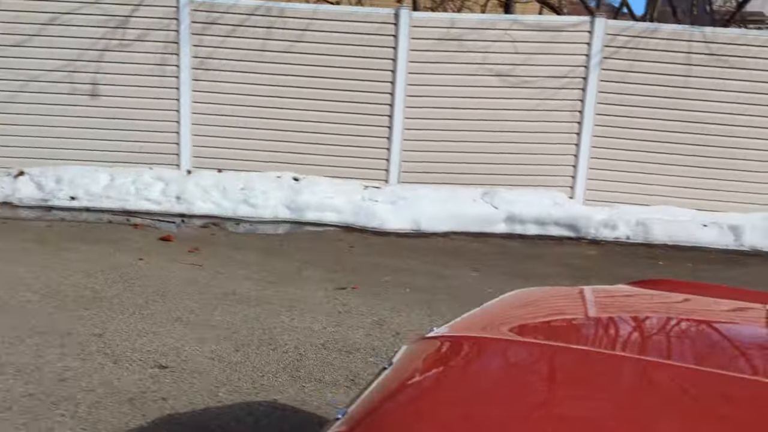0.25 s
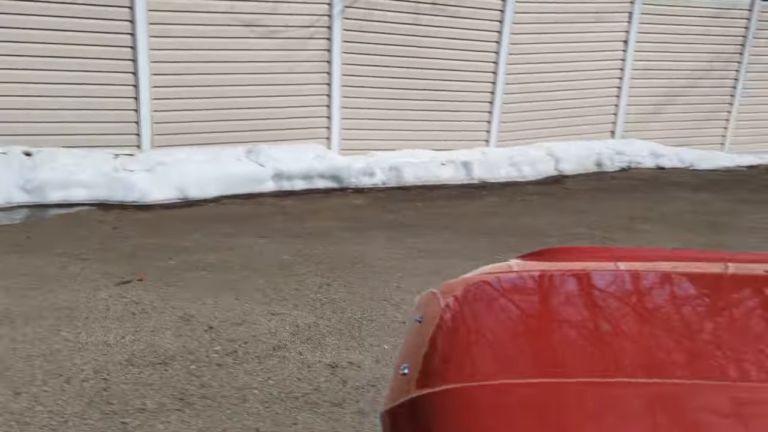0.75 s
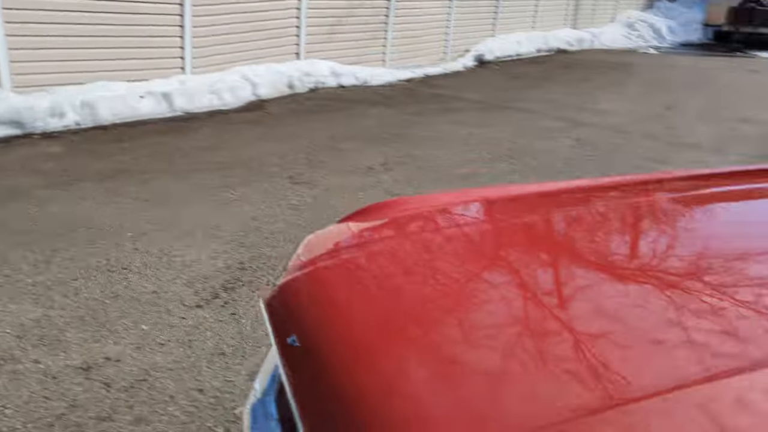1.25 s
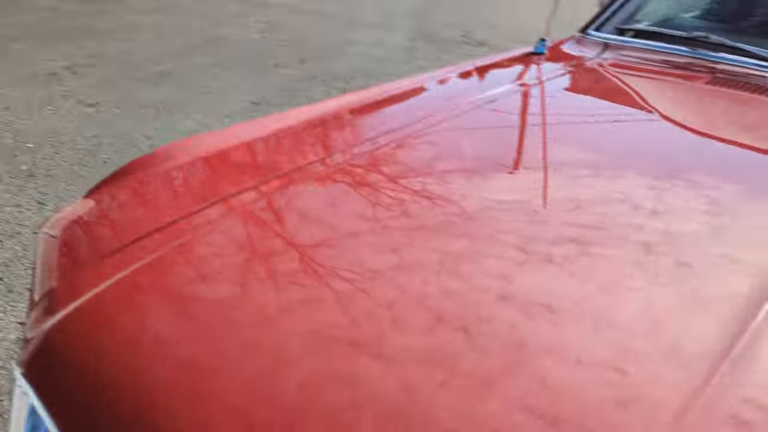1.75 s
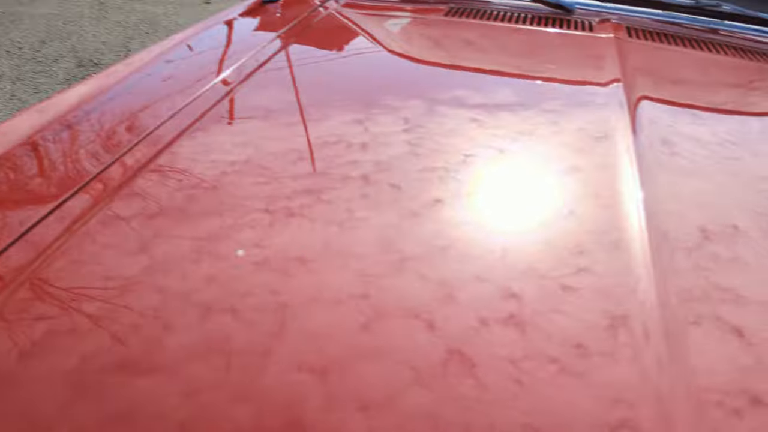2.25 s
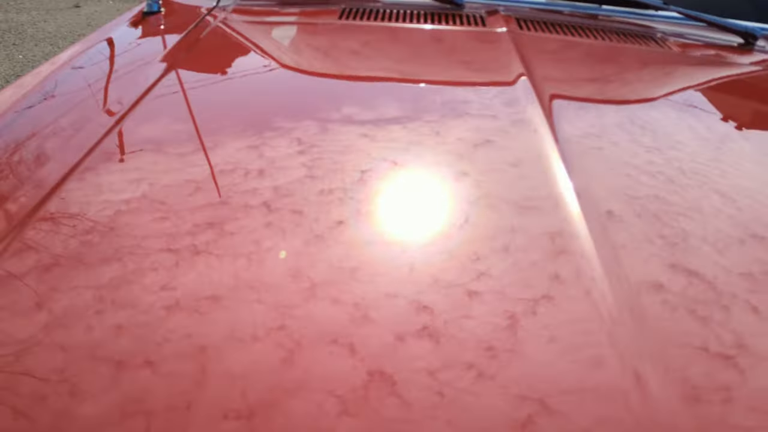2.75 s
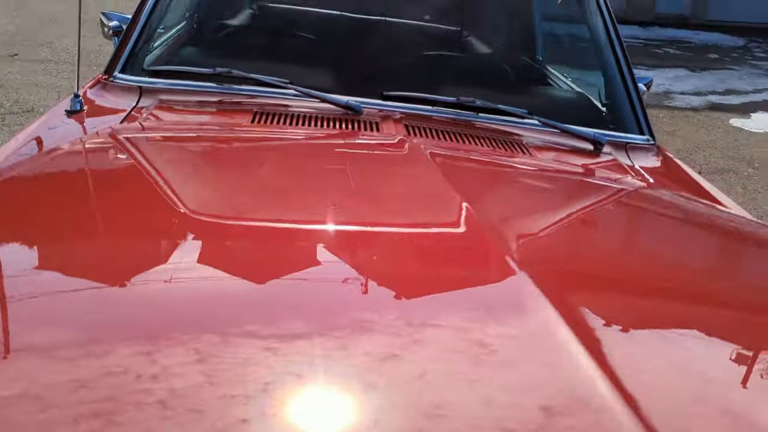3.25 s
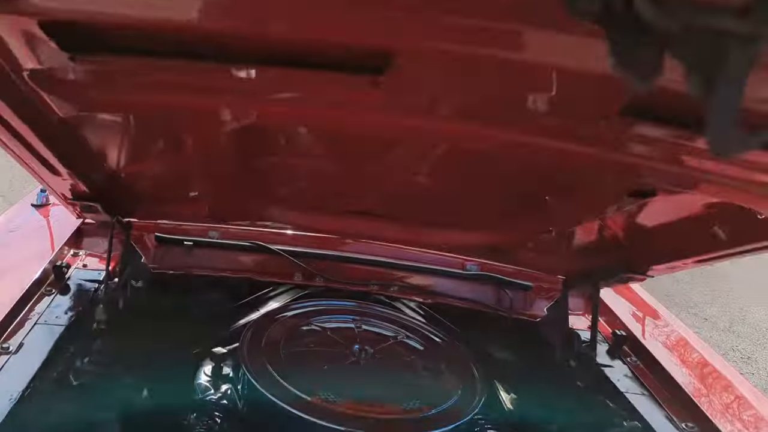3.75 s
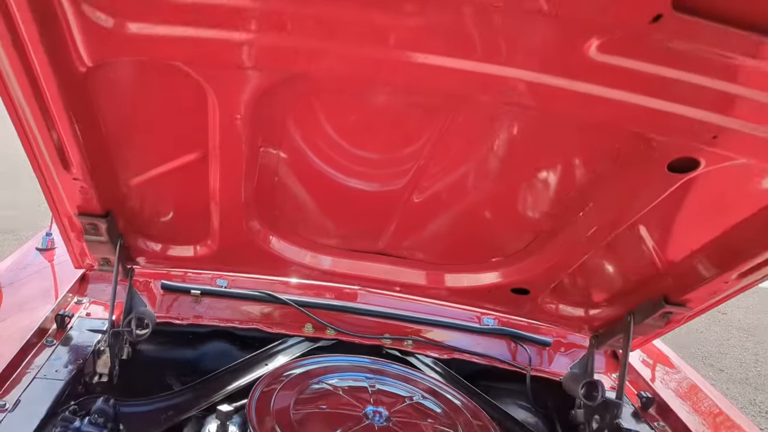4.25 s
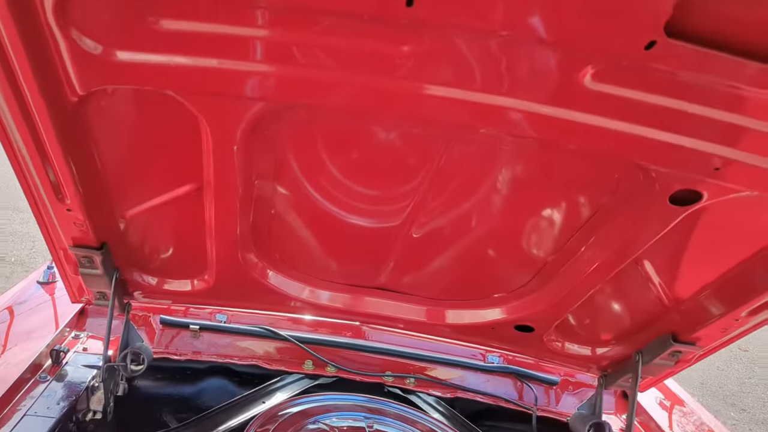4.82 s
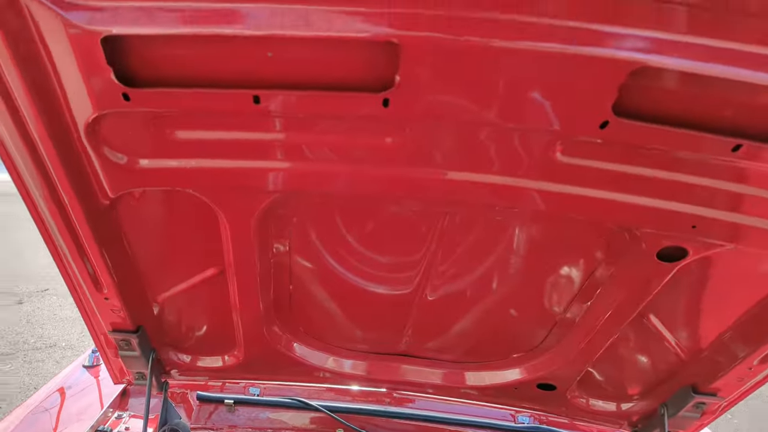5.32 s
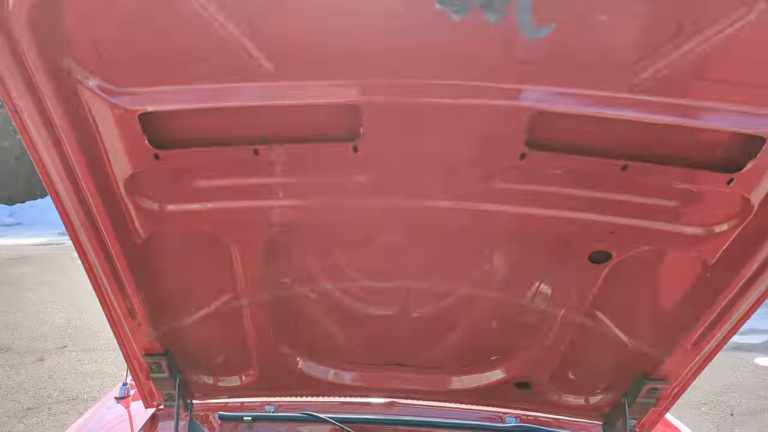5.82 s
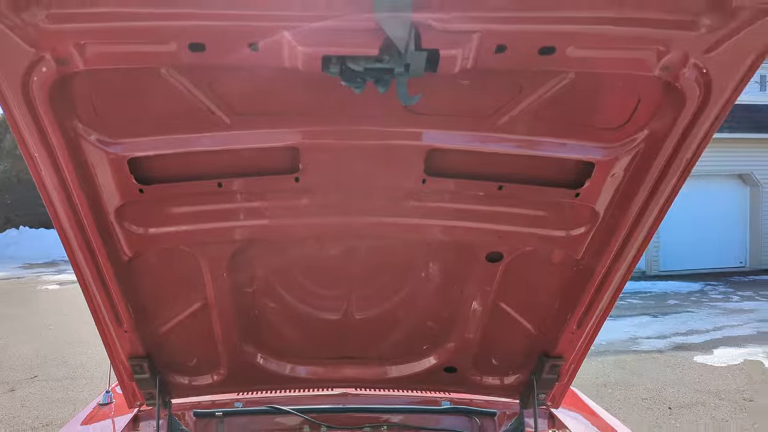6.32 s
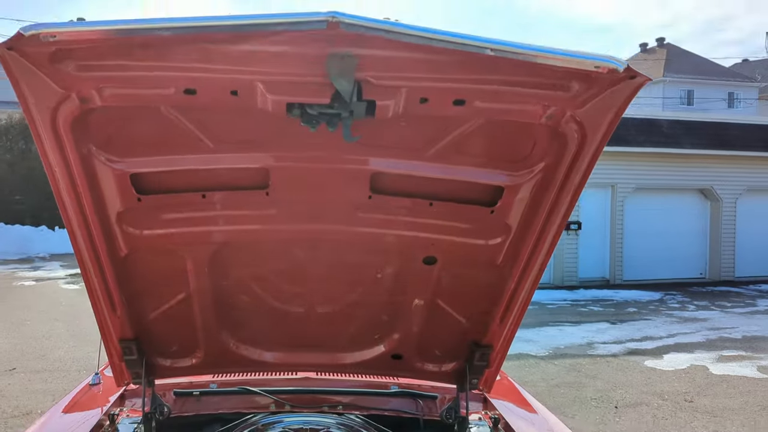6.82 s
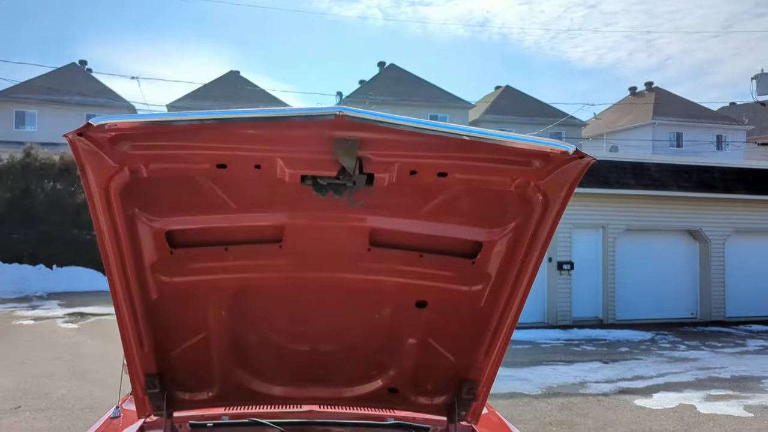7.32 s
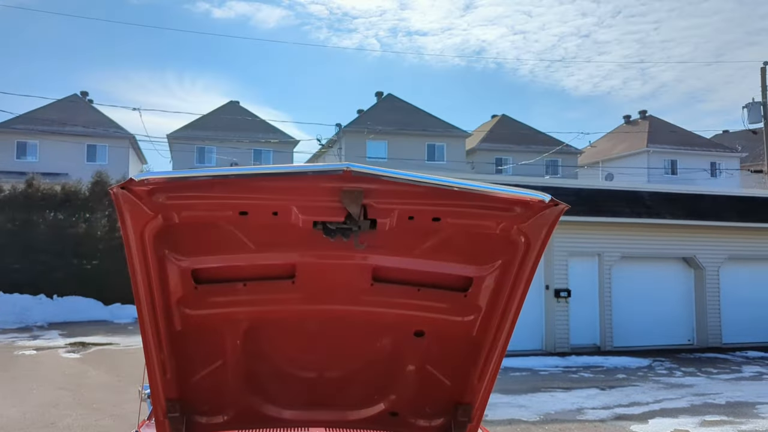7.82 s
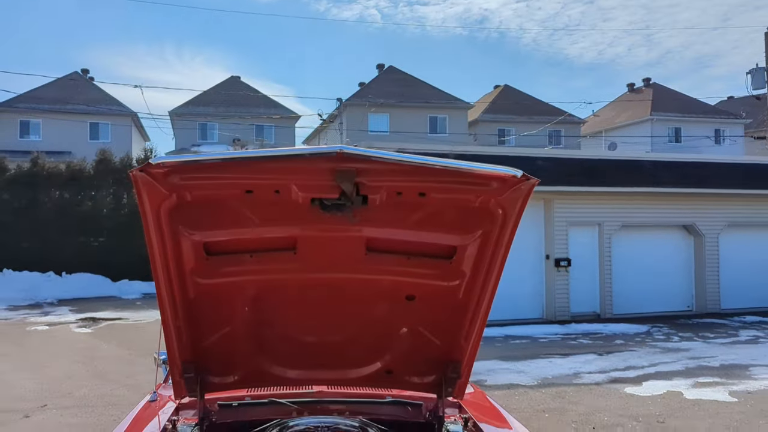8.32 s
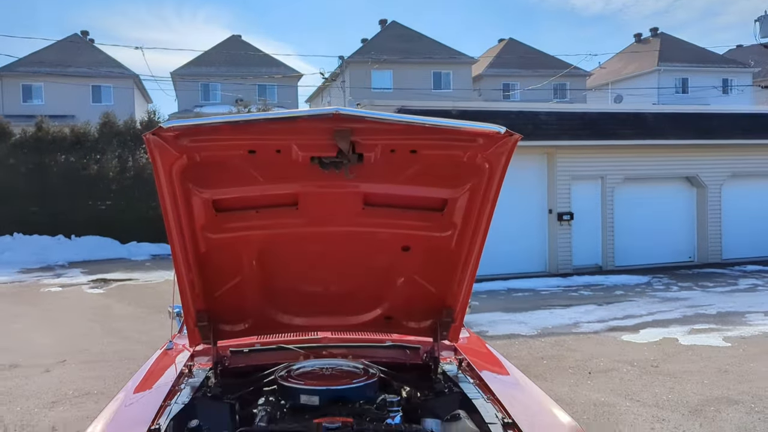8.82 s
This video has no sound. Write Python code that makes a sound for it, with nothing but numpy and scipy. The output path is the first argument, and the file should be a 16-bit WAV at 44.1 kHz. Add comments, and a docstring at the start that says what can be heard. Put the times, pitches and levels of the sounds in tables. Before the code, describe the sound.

A big V8 idles for about nine seconds, close to a hand-held phone in an outdoor paved yard. At first a lumpy exhaust throb and burble dominate, with muffled fan noise under the closed bonnet. From 0.5 to 1 second a near-pure bass drone around 120 hertz swells, then wavers, beats and briefly drops out as the idle hunts. Faint latch fumbling at 2.5 seconds leads to a loud, bright metal snap at 2.7, with a short steel rattle and dull low thump. Between 3.4 and 4.2 the bonnet opens: broad fan roar and wide, breathy intake hiss rise, pulsing with rapid valve ticks and carrying faint whistles. Light tappet ticks recur about five or six times a second from 3.6 to 5.8, and briefly around 8. After 6 seconds the phone steps back; drone and hiss ease while the steady, uneven idle continues to the end.

```python
"""The exhaust of a big V8 throbs at an uneven idle while a hand-held phone moves round the car's nose.
Firing tones and ragged pulses ring the pipes; a drone swells as the idle nears a pipe resonance.
The bonnet latch snaps as noise rattling steel, with low sine thumps from the bonnet on its spring.
The open bay is coloured noise: fan roar, and intake hiss that flares at valve ticks, with faint whistles.
A loose tappet adds brief bursts, and a fence sends back the bass."""
import sys
import numpy as np
from scipy import signal
from scipy.fft import rfft, irfft, next_fast_len
from scipy.io import wavfile
from scipy.ndimage import uniform_filter1d

SR = 44100
rng = np.random.default_rng(int(sys.argv[2]) if len(sys.argv) > 2 else 0)


def waveform_to_disk(signal):
    """Save audio, clipped to [-1, 1], as 16-bit WAV at the path in sys.argv[1]."""
    frames = np.transpose(np.atleast_2d(signal))
    scaled = np.clip(frames, -1, 1) * 32767
    samples = np.round(scaled).astype(np.int16)
    wavfile.write(sys.argv[1], SR, samples)


N = 399977  # length in samples

# clean firing tones: cycle_multiple, level_db (beside the throb), wander_db, phase_turns
FIRING_TONES = [(8, -2, 1.5, 0), (11, -7, 3.5, .1), (10, -11, 4, .2), (12, -13, 4, .6)]
# pipe resonances of the throb: pitch_hz, width_hz, level_db (beside the throb)
THROB_PIPE = [(58, 22, -5), (84, 24, -10), (120, 26, -1), (155, 30, -8)]
# pipe resonances of the burble: pitch_hz, width_hz, level_db (beside each other)
BURBLE_PIPE = [(203, 20, -11), (224, 20, 0), (243, 20, -3.5), (270, 26, -6), (292, 18, -13), (320, 24, -18),
               (372, 16, -21)]
# upper pipe note: pitch_hz, width_hz
PIPE_NOTE = (343, 18)
# fader of the low throb: time_s, gain_db
THROB_FADER = [(0, -30.5), (5, -30), (9.07, -34)]


def exhaust(cycle, burble_db, note_db):
    """Clean firing tones, and ragged firings with gas turbulence ringing the pipes."""
    tones = np.zeros(N)
    for multiple, level_db, wander_db, phase_turns in FIRING_TONES:
        gain = np.sqrt(2) * undb(level_db + wander_db * walk(6))
        tones += gain * np.cos(2 * np.pi * (multiple * cycle + phase_turns))
    pulses = firings(cycle, jitter_s=.0004, scatter=.4)
    turbulence = rng.standard_normal(N)
    gas = level(pulses, 0) + level(turbulence, -3)
    throb = (tones + pipe(gas, THROB_PIPE)) * undb(curves(THROB_FADER)[0])
    burble = level(pipe(gas, BURBLE_PIPE), 2.66) * undb(burble_db)
    note = level(band(gas, *PIPE_NOTE), 2.75) * undb(note_db)
    return throb + burble + note


# lumpy firing strengths, one per firing of the cycle: mean_level_db
FIRING_STRENGTH = [-3.5, 0, -2.5, -3, -4, -1, -3, 0.5]


def firings(cycle, jitter_s, scatter):
    """One pulse a cylinder, each a little early or late and of its own strength."""
    at = np.flatnonzero(np.diff(np.floor(8 * cycle)))
    strength_luck, timing_luck = rng.standard_normal((2, len(at)))
    cylinder = np.floor(8 * cycle[at + 1]).astype(int) % 8
    size = undb(np.array(FIRING_STRENGTH)[cylinder]) + scatter * strength_luck
    shift = (jitter_s * SR * timing_luck).astype(int)
    pulses = np.zeros(N)
    pulses[np.clip(at + shift, 0, N - 1)] = size
    return pulses


# faders of the hum: time_s, drone_db (as if on the resonance), beats_db (its neighbours)
HUM_FADERS = [(0, -27.5, -33), (.45, -14.5, -28.5), (.7, -10, -33), (1.0, -6.5, -33.5), (1.5, -9, -24.5),
              (1.7, -7.5, -28), (1.95, -9, -21.5), (2.2, -3.5, -38), (2.8, -5.5, -22), (3.1, -11, -20),
              (3.35, -6, -25), (3.6, -8, -34), (4.15, -5, -26), (4.5, -6.5, -25), (5.0, -5.5, -32),
              (5.7, -7, -30), (6.1, -11.5, -26), (6.6, -11.5, -30), (7.3, -14, -34), (7.9, -11.5, -31.5),
              (8.5, -13, -30.5), (9.07, -12.5, -37)]
# pipe resonance that swells the drone: pitch_hz, width_hz
DRONE_PIPE = (125, 8)
# neighbours that beat with the drone: cycle_multiple, level_db (before the beats fader)
BEAT_TONES = [(20, -2), (22, 0.5), (23, 0)]
# brief dips and jumps of the hum: centre_s, change_db
HUM_LURCHES = [(.12, 2), (.35, -3), (.47, 2.5), (.81, -5), (.99, 1), (1.712, -11), (1.828, -8), (2.054, -3),
               (2.323, -16), (2.654, -14), (2.746, -21), (2.862, -1), (3.133, -19), (3.35, -16),
               (3.923, -14), (4.0, -4.5), (4.267, -14), (4.399, -13), (4.49, -3), (4.578, -12.5),
               (4.76, -8), (4.83, -5), (5.15, -4.5), (5.283, -4), (5.7, -1.5), (5.78, 3), (5.997, -8),
               (6.15, 5), (6.54, -8), (6.717, -7), (7.25, 6), (7.59, 5), (7.696, -14), (7.977, -16),
               (8.51, 2), (8.71, 4), (8.867, -8)]
DRONE_MULTIPLE = 21  # of the cycle rate
BEAT_TURNS = -0.21  # phase of the neighbours, in turns
LURCH_S = 0.032  # from the centre of a lurch to 1/e of its dB change


def hum(cycle):
    """A near-pure drone follows the idle through a pipe resonance, beats with the cycle and lurches."""
    pitch_hz, width_hz = DRONE_PIPE
    pole = np.exp((2j * pitch_hz - width_hz) * np.pi / SR)
    driver = np.exp(2j * np.pi * DRONE_MULTIPLE * cycle)
    drone = signal.lfilter([1 - abs(pole)], [1, -pole], driver).real
    beats = sum(undb(level_db) * np.cos(2 * np.pi * (multiple * cycle + BEAT_TURNS))
                for multiple, level_db in BEAT_TONES)
    lurch_db = np.zeros(N)
    around = np.arange(-SR // 10, SR // 10)
    for centre_s, change_db in HUM_LURCHES:
        lurch_db[int(centre_s * SR) + around] += change_db * np.exp(-(around / SR / LURCH_S) ** 2)
    drone_db, beats_db = curves(HUM_FADERS)
    return np.sqrt(2) * (drone * undb(drone_db) + beats * undb(beats_db)) * undb(lurch_db)


# latch snaps: start_s, level_db (noise before decay and mix), t60_s, top_hz, left_minus_right_db
LATCH_SNAPS = [(2.468, -29.5, 0.055, 1500, 3), (2.505, -26, 0.07, 7000, 6), (2.7125, -4.5, 0.12, 14600, 2),
               (2.7207, -18, 0.14, 14400, 16), (2.743, -13, 0.07, 11900, 16), (2.755, -14, 0.12, 4840, 4),
               (2.772, -24.5, 0.37, 2170, 2.5)]
# what latch and bonnet ring with: pitch_hz, width_hz, level_db (before width trim and mix)
STEEL_MODES = [(635, 160, 10.5), (820, 170, 7), (1017, 210, 9.5), (1250, 260, 5.5), (1510, 340, 3),
               (1810, 750, -1), (2890, 1300, -3), (3660, 650, -1), (4170, 180, 0), (4730, 500, 0),
               (5240, 400, -4.5), (6300, 600, -5), (8479, 1100, -8), (11950, 900, -5)]
# the bonnet jumps on its spring: start_s, pitch_hz, envelope_peak_db, time_to_peak_s
BONNET_THUMPS = [(2.724, 59, -7.5, .042), (2.757, 150, -17, .025), (2.755, 228, -12, .028)]


def latch():
    """Each snap is a decaying crack of noise that rattles the steel; low sines thump with the bonnet."""
    crack, thump = np.zeros((2, N)), np.zeros(N)
    t = np.arange(SR // 2) / SR
    for start_s, level_db, t60_s, top_hz, pan_db in LATCH_SNAPS:
        shape = (1 - np.exp(-t / .003)) * np.exp(-np.log(1000) * t / t60_s)
        tone = signal.butter(1, [500, top_hz], "band", fs=SR, output="sos")
        noise = signal.sosfilt(tone, rng.standard_normal((2, len(t))))
        pan = undb(np.array([[pan_db], [-pan_db]]) / 2)
        crack[:, int(start_s * SR):][:, :len(t)] += level(noise, level_db) * shape * pan
    # the width trim lifts narrow modes and lowers wide ones
    ring = sum(undb(level_db) * np.sqrt(300 / width_hz) * band(crack, pitch_hz, width_hz)
               for pitch_hz, width_hz, level_db in STEEL_MODES)
    for start_s, pitch_hz, peak_db, peak_s in BONNET_THUMPS:
        shape = (t / peak_s * np.exp(1 - t / peak_s)) ** 2
        thump[int(start_s * SR):][:len(t)] += undb(peak_db) * shape * np.sin(2 * np.pi * pitch_hz * t)
    return thump + undb(-1) * ring + undb(-7) * crack


# the loosest tappet at its loudest: start_s, level_db (before envelope and noise trim)
TAPPET_HITS = [(3.646, -35), (3.8622, -37), (3.993, -39), (4.171, -35), (4.3488, -36), (4.529, -38),
               (4.7108, -37), (4.8869, -35), (5.049, -29), (5.2371, -35), (5.4616, -48), (5.5932, -38),
               (5.7663, -47), (7.9262, -38.5), (8.1132, -41), (8.2952, -41)]


def tappet():
    """Brief bursts of band noise, as the loosest tappet rings the valve cover."""
    push = np.zeros(N)
    t = np.arange(SR // 25) / SR
    shape = t / 0.0038 * np.exp(1 - t / 0.0051)
    for start_s, level_db in TAPPET_HITS:
        start = int(start_s * SR)
        push[start:][:len(t)] = undb(level_db) * shape[:N - start]
    return np.array([level(band(rng.standard_normal(N), 3030, 2000), -1.5) * push for _ in "LR"])


# colours of the bay noise, before levelling: bonnet shut, leaning in, stepping back;
# each holds pitch_hz, density_db
ROAR_COLOURS = [
    [(220, -22), (380, -2.5), (446, -13.5), (553, -6), (655, -14.5), (840, -15.5), (910, -16), (978, -11.5),
     (1050, -17), (1400, -17), (3200, -27), (4160, -67), (7040, -120)],
    [(220, -28), (380, 1.5), (450, -5), (593, 2.5), (655, -5.5), (818, -1), (1110, -5.5), (1380, -4),
     (1600, -7.5), (1930, -9.5), (2090, -4), (2450, -22), (3200, -14.5), (4160, -70), (7040, -120)],
    [(220, -41), (380, -9), (423, -8), (466, -2.5), (588, 3.5), (716, -6), (871, -5.5), (943, -3.5),
     (1190, -5), (1490, -8.5), (2120, -5), (2610, -17.5), (3200, -23), (4160, -57), (7040, -120)],
]
HISS_COLOURS = [
    [(1290, -28), (2200, -3), (2800, -15), (3700, -2.5), (4020, -7), (4950, -8), (5650, -10.5),
     (8610, -10.5), (9830, -16.5), (14400, -14.5), (15900, -20)],
    [(1290, -32), (2200, -3), (2470, -4), (3470, -3), (3740, -0.5), (4230, -2.5), (5030, -3), (5560, -7),
     (5980, -4), (7730, -5), (8750, -1.5), (9830, -10), (12000, -3), (14900, -10.5), (15900, -13)],
    [(1290, 3.5), (2200, -6.5), (2550, -17), (2800, -20), (3040, -5), (3670, -8), (4750, -2), (5560, -5),
     (6130, -1), (7360, -9), (8680, -4), (9830, -9), (13600, -7), (15000, -11), (15900, -21)],
]
# valve ticks: place_firings (in the cycle), level_db (mean over the hiss, before attack), decay_s
VALVE_TICKS = [(3.2, 1, .012), (5.3, 0, .01), (.3, -2.5, .008), (6.6, -4, .008), (1.4, -4, .008)]


def bay(cycle, roar_db, hiss_db):
    """Fan roar, and intake hiss that flares at each valve tick, stronger on some cycles."""
    flare = np.zeros(N)  # added power
    for place_firings, level_db, decay_s in VALVE_TICKS:
        turn = cycle - place_firings / 8
        luck = rng.standard_normal(99)[np.floor(turn).astype(int) + 2]
        since_s = turn % 1 / 5.6  # at a nominal 5.6 cycles per s
        shape = (1 - np.exp(-since_s / .005)) * np.exp(-since_s / decay_s)
        flare += undb(level_db + 1.8 * luck) ** 2 * shape
    roar = air(ROAR_COLOURS) * undb(roar_db + 1.5 + .7 * walk(12)) * np.sqrt(1 + .35 * flare)
    hiss = (air(HISS_COLOURS) + whistles()) * undb(hiss_db + .3 * walk(20)) * np.sqrt(1 + flare)
    return flicker(roar + hiss)


# narrow bands that stand out of the hiss: pitch_hz, width_hz, level_db (beside the hiss, bonnet up)
BAY_WHISTLES = [(3040, 140, -23), (3960, 90, -22), (4260, 70, -21), (4850, 200, -20), (5910, 100, -21),
                (8560, 400, -19), (11970, 150, -17)]


def whistles():
    """Narrow bands of noise that come and go, each on its own, weaker while the bonnet is shut."""
    bands = np.zeros((2, N))
    for pitch_hz, width_hz, level_db in BAY_WHISTLES:
        sides = [level(band(rng.standard_normal(N), pitch_hz, width_hz), level_db) for _ in "LR"]
        bands += undb(2.5 * walk(1.5)) * np.array(sides)
    shut = curves(BAY_STANCE)[0]
    return bands * (1 - .6 * shut)


# likeness of left and right: pitch_hz, share (0-1)
STEREO_LIKENESS = [(300, 0.69), (640, 0.82), (1400, 0.38), (3000, 0), (16000, 0)]
# share of each bay colour: time_s, shut_share, leaning_in_share, stepping_back_share (0-1)
BAY_STANCE = [(0, 1, 0, 0), (3.3, 1, 0, 0), (3.6, 0, 1, 0), (5.3, 0, 1, 0), (6.4, 0, 0, 1), (9.07, 0, 0, 1)]


def air(colours):
    """Stereo noise whose colour follows the stance; the bass is alike left and right, the treble is not."""
    size = next_fast_len(N)
    log_hz = np.log(np.arange(size // 2 + 1) * SR / size + 1)
    like_hz, like_share = np.transpose(STEREO_LIKENESS)
    like = np.clip(np.interp(log_hz, np.log(like_hz), like_share), 0, 1)
    mid_side = rfft(rng.standard_normal((2, size))) * np.sqrt([1 + like, 1 - like])
    out = np.zeros((2, N))
    for colour, share in zip(colours, curves(BAY_STANCE)):
        hz, density_db = np.transpose(colour)
        gain = undb(np.interp(log_hz, np.log(hz), density_db, left=-99, right=-99))
        mid, side = irfft(mid_side * gain, size)[:, :N]
        out += share * np.array([mid + side, mid - side]) / np.sqrt(np.mean(mid ** 2))
    return out


# patches of noise as many small parts ring briefly: width_hz, length_s, spread_db
FLICKER_PATCHES = [(90, .035, 2.4), (260, .35, .9)]


def flicker(x):
    """Many small parts ring briefly, so each patch of time and pitch gets its own small gain."""
    hz, s, spec = signal.stft(x, SR, nperseg=512)
    for width_hz, length_s, spread_db in FLICKER_PATCHES:
        field = rng.standard_normal(spec.shape[1:])
        field = uniform_filter1d(field, size=round(width_hz / hz[1]), axis=0)
        field = uniform_filter1d(field, size=round(length_s / (s[1] - s[0])), axis=1)
        spec = spec * undb(spread_db * field / field.std())
    return signal.istft(spec, SR, nperseg=512)[1][:, :N]


def undb(db):
    """Decibels to gain."""
    return 10 ** (np.asarray(db) / 20)


def level(x, db):
    """Scale to an rms level."""
    return x * undb(db) / np.sqrt(np.mean(x ** 2))


def curves(table):
    """Table columns joined by straight lines in time."""
    s, *columns = np.transpose(table)
    return [np.interp(np.arange(N) / SR, s, column) for column in columns]


def band(x, hz, width_hz):
    """Resonance applied twice, for dark valleys; each pass is wider so that the pair keeps the width."""
    b, a = signal.iirpeak(hz, hz / width_hz / 1.55, fs=SR)
    once = signal.lfilter(b, a, x)
    return signal.lfilter(b, a, once)


def walk(rate_hz):
    """Random levels held 1 / rate_hz seconds and slewed twice; spread near 1."""
    hold = int(SR / rate_hz)
    held = np.repeat(rng.standard_normal(N // hold + 1), hold)
    return 1.3 * uniform_filter1d(uniform_filter1d(held, hold), hold)[:N]


def pipe(x, modes):
    """Pipe resonances side by side; neighbours swing in opposite phase."""
    return sum((-1) ** k * level(band(x, hz, width_hz), level_db)
               for k, (hz, width_hz, level_db) in enumerate(modes))


# idle hunting: time_s, cycle_rate_hz (a cycle is two turns and eight firings)
IDLE_HUNT = [(0, 5.655), (.36, 5.641), (.72, 5.096), (.91, 5.644), (1.48, 6.03), (1.59, 5.546),
             (1.97, 5.177), (2.14, 5.735), (2.81, 5.736), (2.9, 5.468), (3.19, 5.336), (3.64, 5.847),
             (4.32, 5.603), (4.5, 5.411), (4.8, 5.662), (5.05, 5.855), (5.34, 5.449), (5.59, 5.77),
             (5.92, 5.605), (6.56, 5.507), (6.61, 5.624), (6.74, 5.506), (7.47, 5.691), (7.76, 5.41),
             (8.1, 5.392), (8.41, 5.573), (8.81, 5.567), (9.07, 5.3)]
# faders heard from the moving phone, before each layer's own trim:
# time_s, burble_db, pipe_note_db, fan_roar_db, intake_hiss_db, bass_left_minus_right_db
PHONE_PLACE = [(0, -30, -38.5, -42, -52.5, 2), (.63, -36, -56.5, -43.5, -54.5, 0.6),
               (1.3, -26.5, -53, -39.5, -50.5, 0), (2.07, -27, -54.5, -42, -50.5, -0.5),
               (2.5, -25.5, -45, -39.5, -53, 0), (3.11, -24.5, -52, -42.5, -53, -0.5),
               (3.36, -25.5, -54, -41, -52.5, 0), (3.53, -24.5, -52, -38.5, -43.5, 2),
               (3.66, -28.5, -47, -37.5, -39, 0.5), (4.14, -29, -40, -35, -37.5, 1),
               (4.6, -29.5, -42, -34.5, -38.5, 0.9), (5.7, -29, -49.5, -33.5, -37, 0.1),
               (6.2, -27, -38, -34, -38.5, .5), (6.9, -28, -41.5, -36, -41.5, 0.5),
               (7.2, -30, -37.5, -35, -41, 1), (7.8, -30, -41, -37, -43, 1),
               (9.07, -30, -45.5, -37.5, -43.5, 1)]


def scene():
    """Engine, bay and latch; a fence beside the car sends the bass back, opposite in polarity by side."""
    cycle = np.cumsum(curves(IDLE_HUNT)[0]) / SR
    burble_db, note_db, roar_db, hiss_db, pan_db = curves(PHONE_PLACE)
    bass = exhaust(cycle, burble_db, note_db) + hum(cycle)
    late = np.roll(bass, int(0.021 * SR))
    echo = signal.lfilter([1, -1], [1, -.97], late)  # the return is thinned below about 200 Hz
    direct = bass * undb(np.array([pan_db, -pan_db]) / 2)
    engine = direct + undb(-18.5) * echo * np.array([[1], [-1]])
    open_bay = bay(cycle, roar_db, hiss_db) * undb(np.array([[.4], [-.4]]))
    return engine + open_bay + tappet() + latch()


# dip at the phone's microphone port: pitch_hz, width_hz
PORT_DIP = (4110, 110)
TOP_HZ = 15720


def record(dry):
    """The phone cuts the deep bass, rounds the loudest peaks, dips at its port resonance and cuts the top."""
    x = signal.sosfilt(signal.butter(3, 36, "high", fs=SR, output="sos"), dry)
    x = x / (1 + (x / .95) ** 6) ** (1 / 6)
    port_hz, width_hz = PORT_DIP
    x = x - .7 * signal.lfilter(*signal.iirpeak(port_hz, port_hz / width_hz, fs=SR), x)
    return signal.sosfilt(signal.ellip(14, .3, 70, TOP_HZ, fs=SR, output="sos"), x)


dry = scene()
out = record(dry)
waveform_to_disk(out)
```